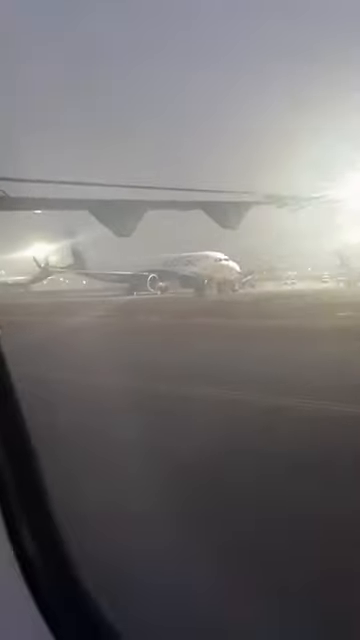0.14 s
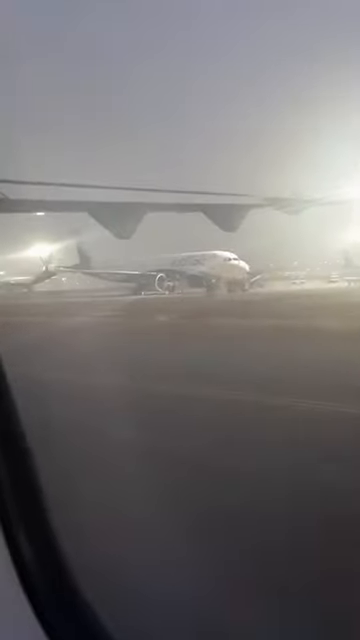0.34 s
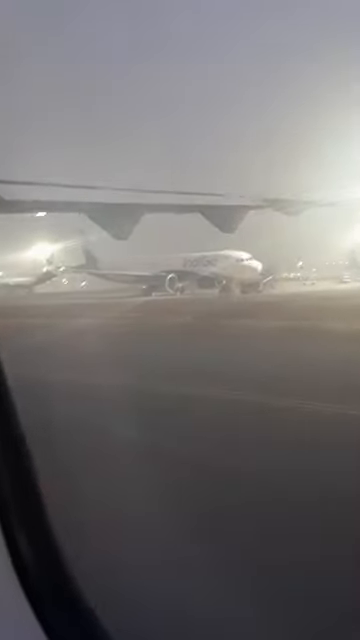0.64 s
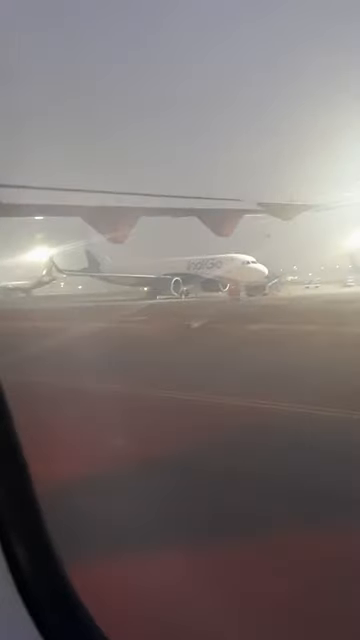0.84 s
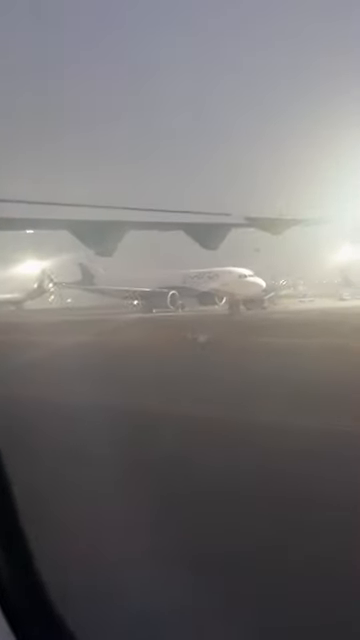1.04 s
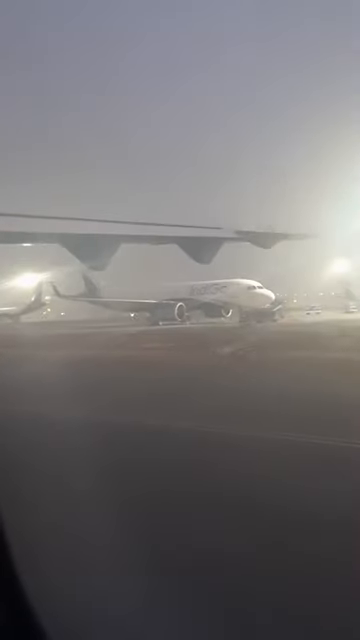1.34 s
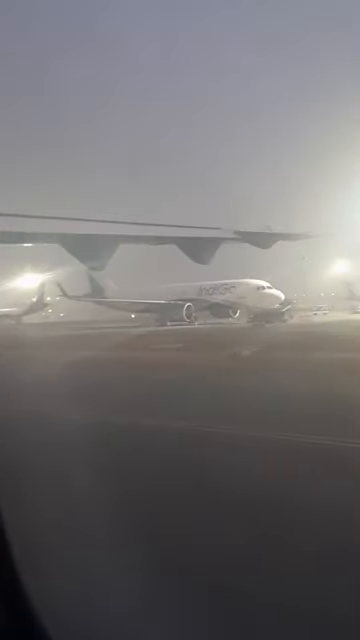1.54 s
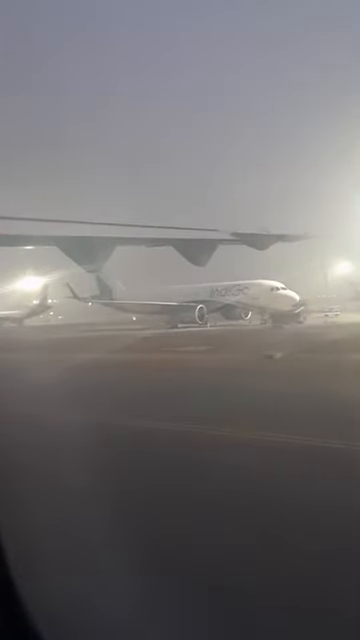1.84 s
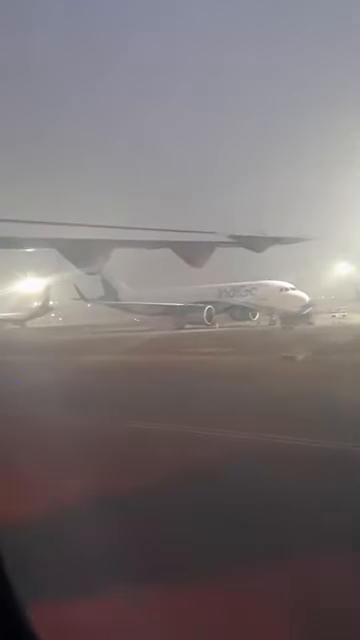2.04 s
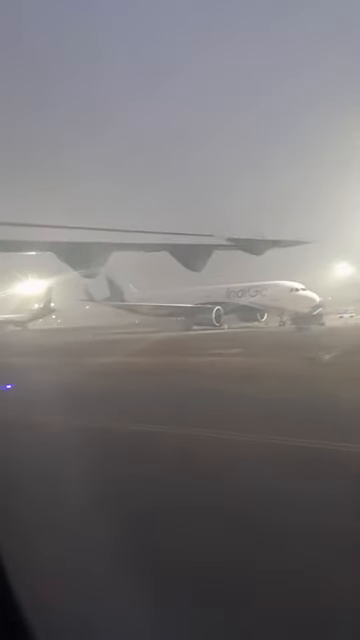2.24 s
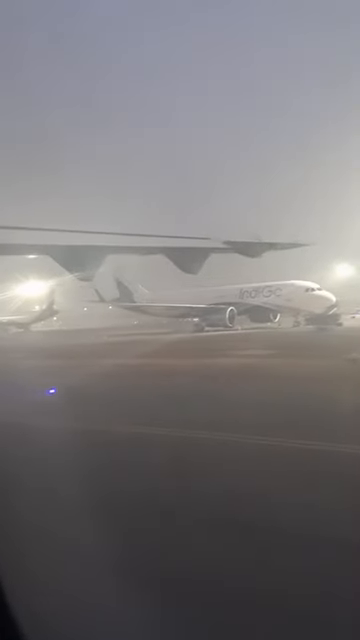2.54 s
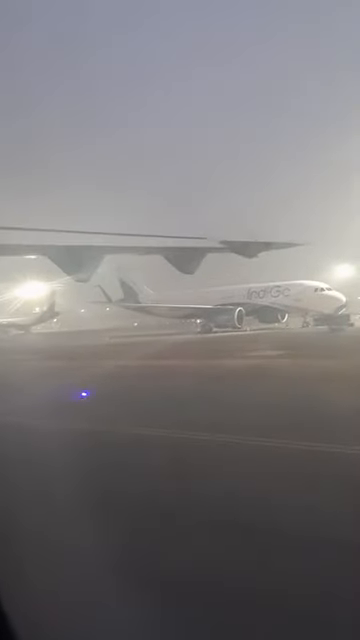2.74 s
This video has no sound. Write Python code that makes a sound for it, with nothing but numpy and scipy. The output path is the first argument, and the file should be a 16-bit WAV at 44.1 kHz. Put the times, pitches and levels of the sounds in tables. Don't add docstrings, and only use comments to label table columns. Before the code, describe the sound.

Low airliner engine hum throbs through the cabin, with soft air hiss and slight cloth rustles

```python
import sys
import numpy as np
from scipy import signal
from scipy.fft import rfft, irfft
from scipy.io import wavfile

SR = 44100
rng = np.random.default_rng(int(sys.argv[2]) if len(sys.argv) > 2 else 0)


def to_linear_factor(level_db):
    exponent = np.asarray(level_db, float) / 20
    return 10 ** exponent


def transcribe(signal):
    frames = np.atleast_2d(signal).T
    limited = np.clip(frames, -1, 1)
    pcm = np.round(limited * 32767).astype(np.int16)
    wavfile.write(sys.argv[1], SR, pcm)


N = 127890


def at_hz(points, hz):
    points_hz, value = np.transpose(points)
    return np.interp(np.log(hz + 1e-9), np.log(points_hz), value)


def rms_one(x):
    return x / np.sqrt(np.mean(x ** 2) + 1e-20)


def drift(rate_hz):
    pole = np.exp(-80 * np.pi * rate_hz / SR)
    noise = rng.standard_normal(N // 40 + 4002)
    slow = signal.lfilter([1], [1, -2 * pole, pole * pole], noise)[4000:]
    return np.interp(np.arange(N) / 40, np.arange(len(slow)), rms_one(slow - slow.mean()))


def pair(alike, pan_db):
    mid, side = rfft(rng.standard_normal((2, N)))
    alike = np.clip(alike, -1, 1)
    mid = np.sqrt(1 + alike) * mid
    side = np.sqrt(1 - alike) * side
    return np.array([to_linear_factor(pan_db / 2) * (mid + side), to_linear_factor(-pan_db / 2) * (mid - side)])


# pitch_hz, likeness (-1..1)
LIKENESS = [(60, 0.32), (170, 0.82), (300, -0.19), (480, 0.86), (650, -0.3), (800, 0.85), (1050, -0.26),
            (1600, 0.11)]
# pitch_hz, left_over_right_db
LEAN = [(60, -1), (300, 0.8), (900, 3.5), (1300, -1.2), (2500, -4.5), (5000, -3.5), (8000, 1.5), (12000, 2)]


def broad(spectrum, level_db, patchy_db):
    hz = np.fft.rfftfreq(N, 1 / SR)
    low_hz, high_hz = spectrum[0][0], spectrum[-1][0]
    edge = np.clip(hz / low_hz, 0, 1) ** 12 / np.clip(hz / high_hz, 1, None) ** 12
    colour = to_linear_factor(at_hz(spectrum, hz)) * edge
    sound = pair(at_hz(LIKENESS, hz), at_hz(LEAN, hz)) * colour
    together = drift(0.83)
    place = 2 * np.log2(hz / low_hz + 1e-9)
    out = 0
    for band in range(-1, int(2 * np.log2(high_hz / low_hz)) + 3):
        share = np.cos(np.pi / 2 * np.clip(place - band, -1, 1)) ** 2
        breath_db = patchy_db * (0.23 * together + drift(24))
        out = out + irfft(sound * share, N) * to_linear_factor(breath_db)
    return to_linear_factor(level_db) * rms_one(out)


def tone(hz, waver_hz, rate_hz, pan_db):
    phase = 2 * np.pi * np.cumsum(hz + waver_hz * drift(rate_hz)) / SR
    sides = to_linear_factor(np.array([[pan_db], [-pan_db]]) / 2)
    return np.sqrt(2) * sides * np.sin(phase + rng.uniform(0, 2 * np.pi))


# pitch_hz, density_db (per Hz)
HISS = [(600, -31), (900, -4), (1150, -8), (1900, -9), (2820, -15.5), (5200, -22), (7650, -26), (8550, -40)]
# pitch_hz, density_db (per Hz)
AIR = [(8550, -12), (9050, -3), (9450, -9.5), (10100, -3.5), (11500, -1.5), (14200, 1), (15000, -2.5),
       (15700, -6.5)]


def vent_hiss():
    hiss = broad(HISS, level_db=-47, patchy_db=1.9)
    return hiss + broad(AIR, level_db=-65, patchy_db=0.7)


WHINE_HZ = [3094, 3295, 3467, 3646, 3742, 3924, 4125, 4161, 4495, 4579, 4909, 5185, 5757, 6103, 6191, 7628,
            9153, 9850, 9960, 10230, 11493, 12205, 12764, 13765, 14018, 14222, 14917, 15278, 15682]
# level_db, left_over_right_db
WHINE = [(-75.5, -16), (-75.5, 1), (-74, -9.5), (-72.5, -2), (-69, -1), (-73, 1), (-79, -10), (-75.5, -6),
         (-82, 0), (-73.5, -2), (-79, -8.5), (-86.5, -5), (-86.5, -0.5), (-71.5, 1.5), (-83, 0.5),
         (-76.5, 9), (-75.5, 0.5), (-90, 0.5), (-89.5, -4), (-88, -3), (-88, -2.5), (-86, 8.5),
         (-87.5, 0.5), (-91, -2), (-85.5, 3), (-80, 3.5), (-86.5, 2.5), (-88.5, 4.5), (-91.5, 1.5)]


def blade_whine():
    out = 0
    for hz, (level_db, pan_db) in zip(WHINE_HZ, WHINE):
        line = tone(hz, 0.0008 * np.sqrt(4000 * hz), 7.9, pan_db)
        line[1] = np.roll(line[1], rng.integers(40))
        flicker_db = 2.5 * drift(6.5)
        out = out + to_linear_factor(level_db + flicker_db) * line
    return out


# centre_s, length_s, level_db
RUSTLES = [
    (.46, 0.059, -56.5),
    (.75, 0.1, -67),
    (1.53, 0.034, -67),
    (2.28, 0.041, -64),
    (2.42, 0.056, -58),
    (2.52, 0.045, -61),
    (2.65, .05, -68),
]
# pitch_hz, density_db (per Hz)
CLOTH = [(1500, -24), (3000, -0.5), (6000, -2), (8400, -18), (11000, -2.5), (14500, -12.5), (15700, -9.5)]


def rustles():
    t = np.arange(N) / SR
    swell = 0
    for centre_s, length_s, level_db in RUSTLES:
        swell = swell + to_linear_factor(level_db) * np.exp(-2 * ((t - centre_s) / length_s) ** 2)
    return swell * broad(CLOTH, level_db=0, patchy_db=2.5)


def squeak():
    centre_s, length_s = 2.645, 0.02
    from_hz, to_hz = 2600, 2420
    u = (np.arange(N) / SR - centre_s) / length_s
    hz = from_hz + (to_hz - from_hz) * np.clip((u + 1) / 2, 0, 1)
    swell = to_linear_factor(-53) * np.exp(-2 * u ** 2)
    return swell * tone(hz, waver_hz=250, rate_hz=150, pan_db=-5)


# pitch_hz, density_db (per Hz)
ROAR = [(28, -40), (48, -18.5), (70, -21.5), (140, 3.5), (200, -8), (300, -22.5), (550, -17), (1100, -35.5)]


def wall_roar():
    return broad(ROAR, level_db=-29.5, patchy_db=-0.1)


MODES_HZ = [64, 82, 116, 167, 215, 252, 329, 411, 500, 585, 667, 745, 836, 918]
# width_hz, level_db, left_over_right_db, likeness (-1..1)
MODES_RUNG = [(13.8, -22.5, -0.5, 0.98), (24.5, -30, -4.5, 1), (24.8, -18.5, -0.5, 1),
              (20.2, -36.5, 2, 0.57), (19.7, -38, 1, 1), (14.1, -30.5, -4, 0.91), (24.7, -33, 9, 0.93),
              (22.4, -34, -1, 0.56), (11.1, -37, 4, 0.72), (15, -42.5, -6.4, .2), (26, -44.5, -1, .2),
              (34.7, -43.5, 1.5, .55), (21.8, -48.5, 3, 0.56), (28, -55, -1.5, -0.18)]
# pitch_hz,
# width_hz, level_db, left_over_right_db, likeness (-1..1)
DUCTS = [(1523, 90, -58.5, -3, 0.21), (2090, 160, -56.5, -7.5, 0.32), (2557, 160, -62.5, -7.5, .2),
         (4430, 440, -64.5, -1.5, .1), (475, 26, -44.5, 0.5, 0.46), (14350, 500, -79.5, 1.5, .1)]


def cabin_modes():
    hz = np.fft.rfftfreq(N, 1 / SR)
    cabin = [(mode_hz, *rung) for mode_hz, rung in zip(MODES_HZ, MODES_RUNG)]
    out = 0
    for centre_hz, width_hz, level_db, pan_db, alike in [*cabin, *DUCTS]:
        peak = 1 / (1 + ((hz - centre_hz) / (0.78 * width_hz)) ** 2)
        out = out + to_linear_factor(level_db) * rms_one(peak) * pair(alike, pan_db) / np.sqrt(2)
    return irfft(out, N)


# time_s, level_db
SHAFT = [(0.03, -18.5), (1.23, -26), (1.35, -17), (1.4, -35.5), (1.52, -16), (1.83, -20), (1.86, -25),
         (1.91, -19.5), (1.98, -17), (2.07, -31.5), (2.46, -20), (2.54, -27.5), (2.6, -17), (2.87, -18)]
# time_s, level_db
BEAT = [(0.03, -37.5), (0.19, -26.5), (0.22, -45.5), (0.88, -32.5), (1.35, -39.5), (1.41, -22),
        (1.52, -28.5), (2.24, -28), (2.29, -51), (2.34, -30.5), (2.77, -29), (2.87, -60)]
# time_s, level_db
UPPER = [(0.03, -24), (0.43, -49), (0.78, -40), (0.83, -26.5), (1.13, -43.5), (1.41, -30), (1.63, -51),
         (1.82, -42), (1.89, -40), (1.97, -25.5), (2.14, -34), (2.87, -37.5)]


def hull():
    t = np.arange(N) / SR

    def level(curve, trim_db):
        return to_linear_factor(trim_db + np.interp(t, *np.transpose(curve)))

    shaft = level(SHAFT, 3) * tone(128.05, waver_hz=1.445, rate_hz=2.86, pan_db=-2.2)
    upper = level(UPPER, 1) * tone(413.7, waver_hz=3.3, rate_hz=5.16, pan_db=3.5)
    beat = level(BEAT, 1) * tone(334.3, waver_hz=2.5, rate_hz=3.88, pan_db=4.5)
    return shaft + upper + beat


def scene():
    air = vent_hiss()
    engines = hull() + cabin_modes() + wall_roar()
    return engines + air + blade_whine() + rustles() + squeak()


def low_pass(x):
    return signal.sosfilt(signal.butter(12, 15760, fs=SR, output="sos"), x)


def record(dry):
    low_cut = signal.butter(4, 48.6, "high", fs=SR, output="sos")
    heard = signal.sosfilt(low_cut, np.tile(dry, 2))[:, N:]
    return low_pass(heard)


dry = scene()
out = record(dry)
transcribe(out)
```